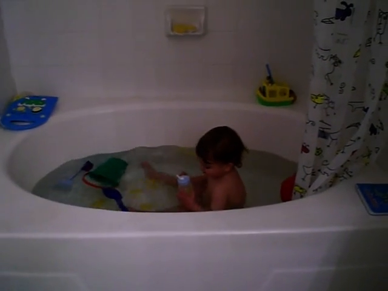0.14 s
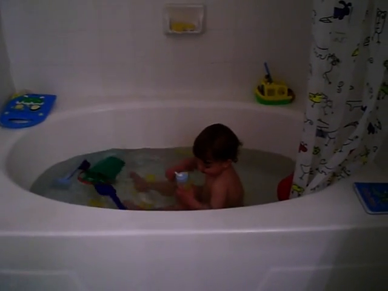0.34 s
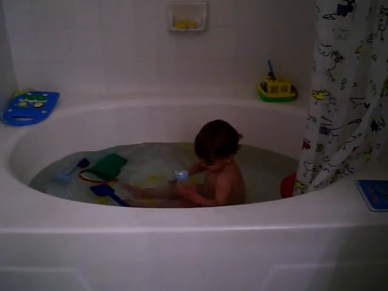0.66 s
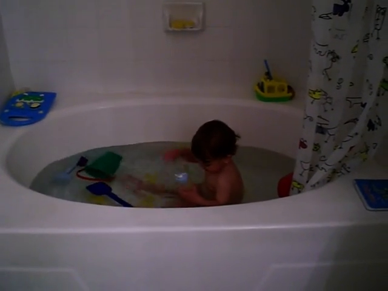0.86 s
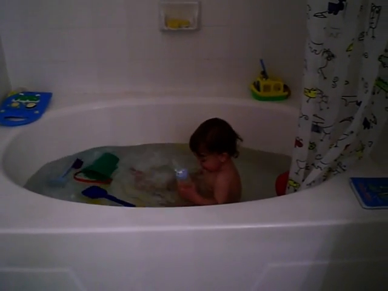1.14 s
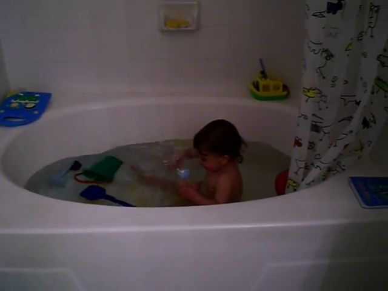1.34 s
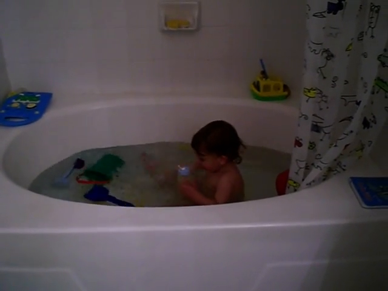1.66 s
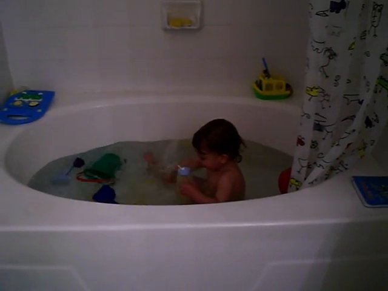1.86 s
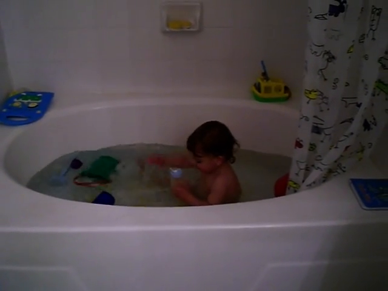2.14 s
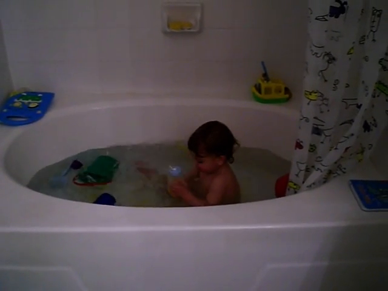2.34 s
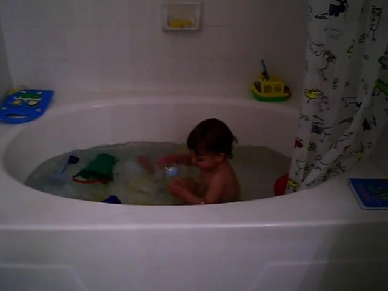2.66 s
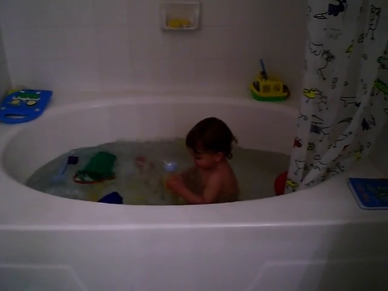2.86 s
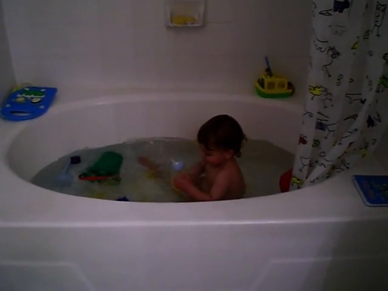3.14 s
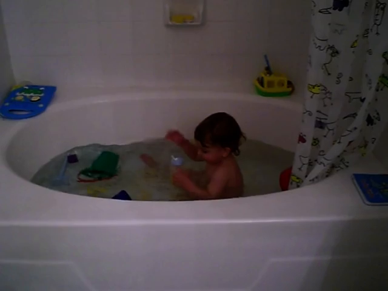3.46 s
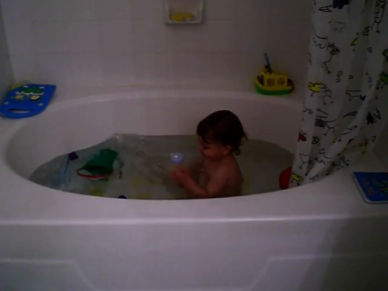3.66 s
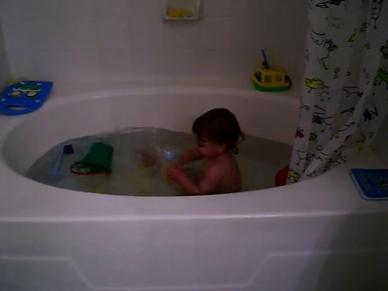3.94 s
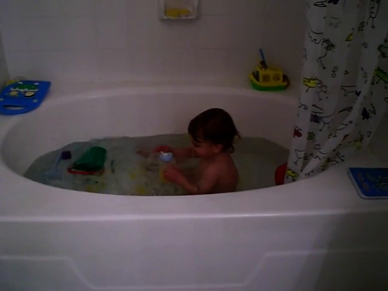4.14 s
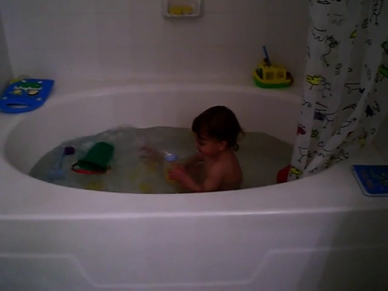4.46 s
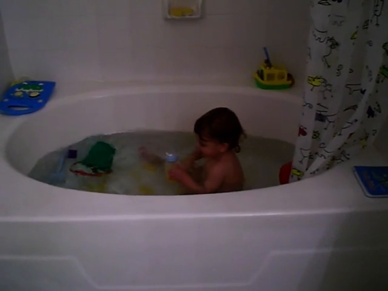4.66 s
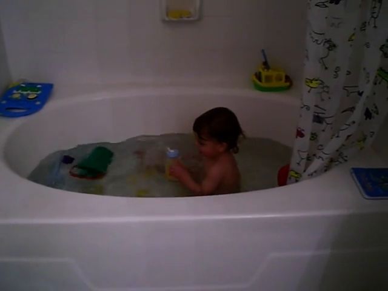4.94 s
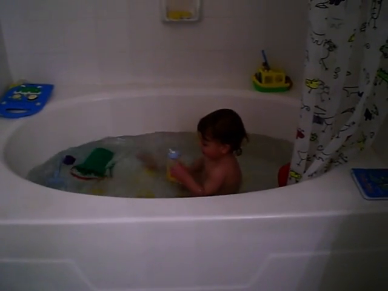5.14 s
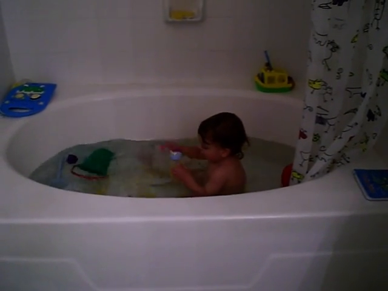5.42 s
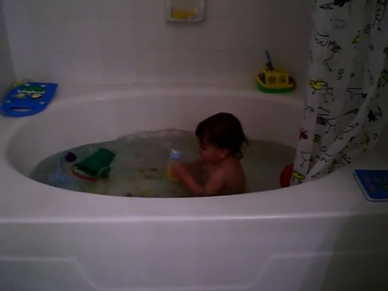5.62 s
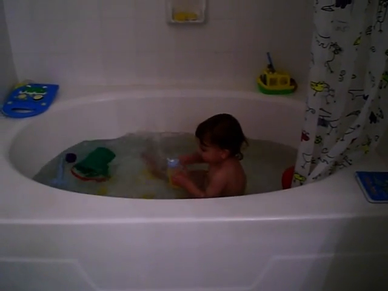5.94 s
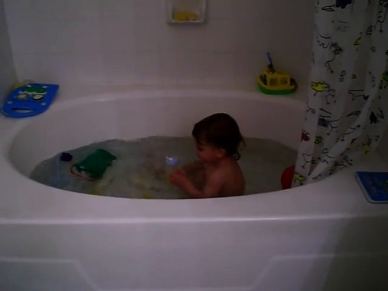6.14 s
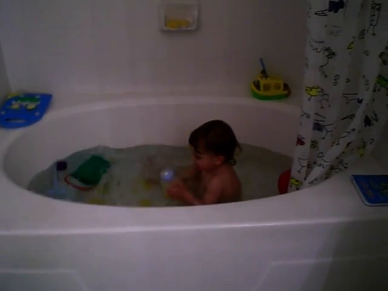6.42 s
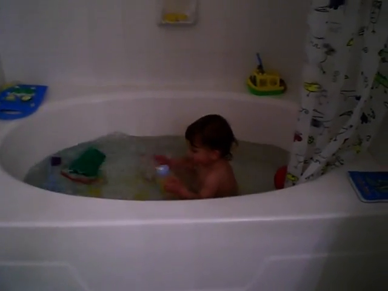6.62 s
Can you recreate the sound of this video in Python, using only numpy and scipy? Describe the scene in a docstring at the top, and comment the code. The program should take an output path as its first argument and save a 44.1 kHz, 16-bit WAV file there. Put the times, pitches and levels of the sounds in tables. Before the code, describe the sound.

A small child paddles in a bathtub inside a hard tiled alcove. Quiet room noise with a faint hum and thin whine comes first, then light slaps and plops. Harder splashes and deep, gulping plunges follow, ease briefly after four seconds, then return densely until near the end. Bubbles gurgle and trickle between strokes. One slightly overloaded microphone, mono, with short bright bathroom echoes.

```python
"""A hand and feet paddle in a bathtub inside a tiled alcove, heard by a single microphone.
At first there is only room noise with a hum and a thin whine; then small slaps throw hissing droplets and plops ring
as gliding sines. From 1.2 s deep plunges also thump the tub, and harder slaps follow until a calmer spell after 4 s.
Dense splashing returns near 4.9 s and lasts almost to the end. Swarms of tiny bubbles gurgle and trickle between
strokes, and echoes, a noisy tail and standing waves of the hard alcove follow every water sound."""
import sys
import numpy as np
from scipy import signal
from scipy.fft import rfft, irfft
from scipy.io import wavfile
from scipy.ndimage import uniform_filter1d

SR = 44100
rng = np.random.default_rng(int(sys.argv[2]) if len(sys.argv) > 2 else 0)


def persist_wave(psi):
    """Save psi, clipped to +-1, as 16-bit WAV."""
    counts = np.round(np.clip(psi, -1, 1) * 32767).astype(np.int16)
    wavfile.write(sys.argv[1], SR, np.atleast_2d(counts).T)


N = 299282

# Quiet room, shape of its noise: pitch_hz, relative level_db (per Hz)
ROOM_NOISE = [(25, -11), (86, -19), (130, -4.5), (460, -7), (1750, -16), (5100, -16.5), (7500, -19),
              (13300, -24), (14500, -32)]
# Steady faint tones: pitch_hz, level_db (rms)
HUMS = [(118.4, -63), (13184, -54)]
# Standing waves between the alcove walls: pitch_hz, relative level_db
STANDING_WAVES = [(62, -6.5), (100, 3), (165, -14), (200, -16), (218, -3.5), (250, -8), (275, -0.5),
                  (297, -3), (346, -1), (409, 2), (457, 2.5), (482, 4), (545, -9), (575, -2.5), (610, 4),
                  (664, -0.5), (727, 4), (774, -1), (800, 0), (860, -25), (910, -4.5), (959, -15.5),
                  (990, -1), (1040, -2), (1086, 0.5), (1136, 2), (1186, -4.5), (1271, 0.5), (1340, -6.5)]
# How long the alcove's tail takes to fall by 60 dB: pitch_hz, fade_s
TAIL_FADE = [(60, 0.13), (260, 0.67), (700, 0.49), (1800, 0.27), (5000, 0.44), (13000, 0.14)]
# Loudness of the scattered tail: pitch_hz, level_db
TAIL_COLOUR = [(60, -19), (350, 5.5), (600, 3), (1300, 2.5), (2000, 4.5)]
# Strokes through the water: start_s, hold_s, gurgle_db, trickle_db, mist_db
STROKES = [(0.393, 0.074, -54, -33, -40.5), (0.63, 0.077, -45, -35, -39.5), (.78, .14, -52, -31, -40.5),
           (0.986, 0.055, -35, -42, -45), (1.086, 0.14, -28.5, -25.5, -31.5),
           (1.388, 0.063, -23.5, -22, -31), (1.563, 0.23, -26.5, -22.5, -29),
           (2.003, 0.11, -28, -27.5, -34), (2.15, .18, -26.5, -23.5, -30), (2.586, 0.42, -38, -30, -35.5),
           (3.266, 0.16, -29, -29.5, -36), (3.605, 0.14, -29, -28.5, -29.5),
           (3.993, 0.16, -34.5, -25.5, -35.5), (4.233, 0.26, -35, -35, -39.5),
           (4.783, 0.04, -30, -30.5, -37.5), (4.892, 0.25, -28.5, -27, -36.5),
           (5.365, 0.11, -28, -28, -32.5), (5.543, 0.16, -29.5, -26, -32), (5.987, 0.051, -29, -31, -36),
           (6.066, 0.21, -34, -27.5, -32), (6.541, .25, -23, -26, -34.5)]
# Deep plunges: start_s, level_db, cavity pitch_hz, ring_s (fall of 60 dB), tub wall_db, tub floor_db
PLUNGES = [(1.224, -10.5, 408, 0.033, -38, -60), (1.659, -35, 401, 0.04, -34, -59),
           (1.81, -32.5, 283, 0.19, -58, -61), (2.001, -27, 231, 0.12, -31, -51),
           (2.342, -8.5, 285, 0.087, -20.5, -42), (2.977, -12.5, 292, 0.15, -50, -43),
           (3.628, -32.5, 406, 0.07, -50, -67), (3.758, 0.5, 395, 0.034, -13, -35),
           (4.16, -27, 487, 0.17, -60, -71), (4.414, -20.5, 256, 0.22, -37, -70),
           (5.086, -12, 307, 0.08, -23, -35.5), (5.718, -16, 311, 0.13, -16.5, -30.5),
           (6.244, -2.5, 312, 0.036, -17, -33), (6.483, -25.5, 338, 0.079, -38, -74)]
# Air pockets closing under water: start_s, level_db, pitch_hz, burst of neighbours_db (against the plop)
PLOPS = [(0.291, -31, 6000, -2), (0.334, -32, 2140, -6), (0.355, -21, 5600, 2), (0.356, -28, 2600, 11),
         (0.376, -9, 1800, -25), (0.365, -32, 990, -8), (0.428, -24, 1150, -1), (0.464, -20, 1345, -1),
         (0.583, -18, 3000, -21), (0.657, -33, 1240, 14), (0.699, -18, 1110, -16), (0.775, -26.5, 826, 6),
         (0.798, -23, 2670, 12), (0.836, -14.5, 1030, -4), (0.934, -23, 3210, -17),
         (0.974, -24.5, 750, 6.5), (1.051, -15.5, 2620, -12), (1.099, -22.5, 1760, 14.5),
         (1.117, -6, 1174, -22), (1.199, -5, 886, -3), (1.211, -1.5, 950, -5), (1.224, -6, 874, -7),
         (1.249, -14, 725, -2), (1.385, -23.5, 1370, 16.5), (1.526, -20, 1940, -19), (1.597, -10, 810, -7),
         (1.66, -17.5, 924, -17), (1.782, -1.5, 3510, -2), (2.003, -22.5, 610, -5), (2.12, -18, 1630, -20),
         (2.214, -8, 2232, -16), (2.343, -0.5, 728, -3), (2.375, -37, 680, -2), (2.627, -7.5, 1430, -21),
         (2.673, -5, 823, -2), (2.806, -29, 1760, -6), (2.829, -15.5, 3500, 3), (2.867, -14, 1107, 2),
         (2.958, 1.5, 614, -1), (2.975, -7.5, 472, -2), (3.087, -13, 665, -14), (3.273, -14, 1017, 8),
         (3.38, -16, 823, -23), (3.592, -13.5, 1540, -15), (3.724, -9.5, 1047, 8), (3.757, -3, 1077, -19),
         (3.95, -24, 2480, 12.5), (4.005, -13, 780, 5), (4.022, -17, 3030, -10), (4.024, -19, 774, 13),
         (4.061, -13, 1116, 0), (4.251, -23.5, 542, -15), (4.251, -17, 1350, -13), (4.379, -23, 600, 7),
         (4.491, -12, 937, -14), (4.745, -23, 2180, 5), (4.766, -6.5, 1030, 3), (4.888, -11.5, 1705, -26),
         (4.917, -10, 3160, -1), (4.95, -10, 3580, -15), (5.035, -8.5, 950, 5), (5.073, -3.5, 810, 7.5),
         (5.139, -14.5, 590, -17), (5.371, -4.5, 749, -5.5), (5.409, -16, 728, -15), (5.487, -28, 700, -16),
         (5.555, -5.5, 1395, -10), (5.695, -8, 740, 0), (5.715, -11, 738, 11.5), (5.94, -18, 1354, -15),
         (5.946, -13, 645, 5), (6.036, -19, 704, -24), (6.089, -11, 2230, 0.5), (6.119, -9.5, 2440, 4.5),
         (6.195, -10, 1110, -2), (6.228, -5.5, 670, -2), (6.236, -6, 636, 1.5), (6.289, -11, 567, -15),
         (6.5, -14, 1890, -23), (6.557, -13, 856, -13), (6.646, -11, 1050, -10), (6.724, -10, 2910, 1)]
# Surface struck, or drops landing: start_s, relative level_db, body_db (against the level), tilt_db_per_octave
SLAPS = [(0.2887, -33.5, -35, 3.5), (0.3544, -18, -38, -8.5), (0.554, -22, -32, 3),
         (0.5806, -10.5, -31, -2.5), (0.712, -11, -36, -1), (0.9348, -22.5, -34, -10),
         (1.0528, -14.5, -30, -8.5), (1.098, -4, -26, -1), (1.198, -14, -1, -9), (1.2107, -7.5, 0.5, -5),
         (1.2234, -9, -1.5, -9), (1.3875, -23.5, -6, -12.5), (1.5303, -17.5, -52, -10.5),
         (1.6612, -1, -12.5, -2), (1.7856, -5.5, -19.5, -6.5), (1.806, -15, -15, -3),
         (1.922, -14.5, -15.5, 1.5), (2.094, -13.5, -19, -4.5), (2.2112, -4.5, -21, -2.8),
         (2.3427, -7, 1, -9), (2.375, -13, -4.5, -7.5), (2.626, -18.5, -3, -12.5), (2.808, -19, -29, -9),
         (2.8377, -9.5, -30, -0.5), (2.9162, -15, -2.5, -7), (2.9584, -14, 0, -5), (2.9689, -7, 0.5, -4.5),
         (3.19, -34.5, 4, -10), (3.275, -29, 7.5, -11), (3.379, -27, -26, 2), (3.4992, -20.5, -26, -7),
         (3.5906, -23, -26, -12), (3.6098, -10.5, -21, 3), (3.6214, -8.5, -12.5, -2.5),
         (3.7551, -2.5, -1.5, -5), (3.9502, -22.5, -11, -3), (4.0677, -15.5, -20, -6.5),
         (4.2863, -15.5, -35, 4.5), (4.308, -18, -25, -5), (4.4115, -33.5, 15, -3),
         (4.7615, -19.5, 5.5, 5.5), (4.9164, -9, -15, -3.5), (4.954, -4.5, -28, -0.5),
         (5.04, -9.5, -22, -8), (5.086, -2.5, -11, -11.5), (5.3717, -35, 16.5, -9), (5.4081, -22, 9, -7),
         (5.5577, -6, -16.5, -0.2), (5.575, -2, -24, -3.3), (5.7065, -8, -6, -3),
         (5.718, -5.5, -0.5, -11.5), (5.9475, -31, -2, -3), (6.0462, -28, 7.5, 11), (6.112, -13.5, -28, -1),
         (6.122, -9, -2.5, -5.5), (6.144, -29, -15, -14), (6.2375, -10, 1, -9), (6.5339, -26, -0.5, -11),
         (6.6698, -9.5, -8, -8.5), (6.725, -16, -10, -4)]
# Tone colour of the flying droplets: pitch_hz, relative level_db
SPRAY_COLOUR = [(100, -45), (400, -43), (1500, -19.5), (2500, -2.5), (5000, 2.5), (8000, 3), (12000, -4.5),
                (16000, 14)]
# Tone colour of the duller smack: pitch_hz, relative level_db
BODY_COLOUR = [(40, -53), (300, -23), (480, -37), (600, 5), (900, 1), (1500, 1.5), (2500, -7.5),
               (5000, -21)]
# Narrow dips from the microphone housing: pitch_hz, width_hz (at half depth), level_db
HOUSING_DIPS = [(6650, 180, -15), (7480, 180, -15)]
# Top of the microphone's range: pitch_hz, level_db
ROLL_OFF = [(13500, -3), (15100, -18.5), (15400, -22), (16200, -49)]

ROOM_NOISE_DB = -47  # rms
BAND_LIMIT_HZ = 16190
TUB_WALL_HZ, TUB_FLOOR_HZ = 168, 62

# Strokes swell and fade, in dB per second
ATTACK_DB_PER_S = 339
RELEASE_DB_PER_S = 142, 195, 65  # gurgle, trickle, mist
# What a plop or slap leaves behind: level_db against the event, fade_db_per_s
AFTER_GURGLE, AFTER_TRICKLE, AFTER_MIST = (-25, 153), (-25.5, 370), (-24, 160)
# Octaves from 5 kHz at which a slap's tilt sets its trickle and mist
TRICKLE_OCTAVES, MIST_OCTAVES = -0.28, 0.33
# Foam fizz joins the mist and late drips join the trickle, long after a slap
FIZZ_DB, DRIP_DB, FIZZ_FADE_DB_PER_S = -44, -31, 35
# The gurgle keeps the pitch of the latest loud plops
GURGLE_TOP_HZ, PITCH_MEMORY_DB_PER_S = 1250, 110

PLOP_RISE_OCTAVES = 0.17
PLOP_RING_S, RING_SLOPE = 0.052, 0.067  # 60 dB fall at 1 kHz; smaller bubbles die sooner
SPRAY_S, SPRAY_DB_PER_DOUBLING = 0.018, 44  # time constant at level 0 dB; weaker slaps thin out sooner


def gain_of(db):
    """Turns decibels into amplitude."""
    return 10 ** (np.asarray(db) / 20)


def evened(x):
    """Scales a sound to an rms of 1."""
    return x / np.sqrt(np.mean(x ** 2) + 1e-20)


def read(points, hz):
    """Reads a curve between its points, on a log-frequency axis."""
    f, value = np.transpose(points)
    return np.interp(np.log(hz + 1), np.log(f + 1), value)


def coloured(x, points):
    """Filters a sound by a curve of levels in dB."""
    return irfft(rfft(x) * gain_of(read(points, np.fft.rfftfreq(len(x), 1 / SR))), len(x))


def add(mix, s, sound):
    """Mixes a sound in, starting at time s."""
    part = mix[round(s * SR):][:len(sound)]
    part += sound[:len(part)]


def bubble(hz, rise, t60):
    """A dying sine that glides up by `rise` octaves as the air pocket nears the surface."""
    t60 = max(t60, 0.002)
    t = np.arange(round(t60 * SR)) / SR
    turns = np.cumsum(hz * 2 ** (rise * t / t60)) / SR
    fade = gain_of(-60 * t / t60)
    onset = (1 - np.exp(-t * hz * 1.85)) ** 2
    return fade * onset * np.sin(2 * np.pi * turns)


def hush():
    """Low room noise with a hum and a thin whine."""
    t = np.arange(N) / SR
    tones = sum(np.sqrt(2) * gain_of(db) * np.sin(2 * np.pi * hz * t) for hz, db in HUMS)
    noise = evened(coloured(rng.standard_normal(N), ROOM_NOISE))
    return gain_of(ROOM_NOISE_DB) * noise + tones


def early_echoes():
    """The first bounces off the tiles: 24 random fading clicks."""
    echoes = np.zeros(1400)
    echoes[rng.integers(60, 1400, 24)] = rng.choice([-1., 1.], 24)
    echoes *= np.exp(-np.arange(1400) / 340.0)
    return echoes / np.linalg.norm(echoes)


def scattered_tail(x):
    """Sound energy lingers in each pitch band, while the rippling surface keeps scrambling its waves."""
    hz, _, frames = signal.stft(x, SR, nperseg=512, noverlap=384)
    keep = gain_of(-120 * 128 / SR / read(TAIL_FADE, hz))  # power kept from one frame to the next
    power = [signal.lfilter([0, 0, 0, 1 - k], [1, -k], abs(row) ** 2) for k, row in zip(keep, frames)]
    a, b = rng.standard_normal((2, *frames.shape[::-1])).transpose(0, 2, 1)
    scrambled = np.sqrt(power) * (a + 1j * b)
    tail = signal.istft(scrambled, SR, nperseg=512, noverlap=384)[1][:N]
    return coloured(tail, TAIL_COLOUR)


def standing_waves():
    """Waves trapped between walls ring at fixed pitches; each falls 50 dB in the tail's fade time."""
    t = np.arange(SR) / SR
    ring = np.zeros(SR)
    for k, (hz, db) in enumerate(STANDING_WAVES):
        fade = gain_of(db - 50 * t / read(TAIL_FADE, hz))
        ring += (-1) ** k * fade * np.sin(2 * np.pi * hz * t)
    return ring / np.linalg.norm(ring)


def alcove(x):
    """Hard walls answer with early echoes, a scattered tail and standing waves."""
    early = gain_of(-1.0) * signal.oaconvolve(x, early_echoes())[:N]
    waves = gain_of(-11.5) * signal.fftconvolve(x, standing_waves())[:N]
    return early + scattered_tail(x) + waves


def swell(start, hold, db, release_db_per_s, attack_db_per_s):
    """Power of events that rise, hold and fade: one row each, a point every 64 samples."""
    t = np.arange(0, N + 64, 64) / SR - np.asarray(start)[:, None]
    before = np.maximum(-t, 0)
    after = np.maximum(t - np.asarray(hold)[..., None], 0)
    fade_db = attack_db_per_s * before + release_db_per_s * after
    return gain_of(np.maximum(np.asarray(db)[:, None] - fade_db, -150)) ** 2


def stirring():
    """Strokes, plops and slaps set the levels of gurgle, trickle and mist, and the gurgle's pitch in octaves."""
    start, hold, *stroke_dbs = np.transpose(STROKES)
    plop_s, plop_db, plop_hz, _ = np.transpose(PLOPS)
    slap_s, slap_db, _, tilt_db = np.transpose(SLAPS)

    def left_by(s, db, fade):
        return swell(s, 0., db, fade, 1e5).sum(0)  # starts almost at once

    gurgle = left_by(plop_s, plop_db + AFTER_GURGLE[0], AFTER_GURGLE[1])
    trickle = left_by(slap_s, slap_db + TRICKLE_OCTAVES * tilt_db + AFTER_TRICKLE[0], AFTER_TRICKLE[1])
    drips = left_by(slap_s, slap_db + DRIP_DB, FIZZ_FADE_DB_PER_S)
    mist = left_by(slap_s, slap_db + MIST_OCTAVES * tilt_db + AFTER_MIST[0], AFTER_MIST[1])
    fizz = left_by(slap_s, slap_db + FIZZ_DB, FIZZ_FADE_DB_PER_S)

    rows = []
    for db, release, left in zip(stroke_dbs, RELEASE_DB_PER_S, (gurgle, trickle + drips, mist + fizz)):
        stroke_power = swell(start, hold, db, release, ATTACK_DB_PER_S).sum(0)
        rows.append(np.sqrt(stroke_power + left))
    recent = swell(plop_s, 0., plop_db, PITCH_MEMORY_DB_PER_S, ATTACK_DB_PER_S)
    rows.append(np.log2(np.minimum(plop_hz, GURGLE_TOP_HZ)) @ recent / recent.sum(0))
    # fill in every sample between the points
    return [np.interp(np.arange(N) / 64, np.arange(len(row)), row) for row in rows]


def swarm(pitches_hz, per_s, cycles, spread_db, weight):
    """Random bubbles of many sizes, `per_s` at each pitch; weight(hz) favours some sizes."""
    out = np.zeros(N)
    for hz in pitches_hz:
        strength = gain_of(spread_db * np.minimum(rng.exponential(1, N), 4))
        hits = strength * (rng.random(N) < per_s / SR)
        out += signal.oaconvolve(hits * weight(hz), bubble(hz, 0.6, cycles / hz))[:N]
    return evened(out)


def stirred():
    """Large bubbles gurgle, small ones trickle, the finest droplets hiss as mist."""
    gurgle_level, trickle_level, mist_level, centre = stirring()

    def near_centre(hz):
        return np.exp(-((np.log2(hz) - centre) / 0.53) ** 2)

    gurgle = swarm(np.geomspace(480, 2200, num=30), 22, 26.6, 3.66, near_centre)
    trickle = swarm(np.geomspace(1500, 6300, num=30), 20, 18.6, 3.0, lambda hz: (hz / 3000) ** -0.1)
    mist = swarm(np.geomspace(6300, 15500, num=12), 90, 7, 4.4, lambda hz: (hz / 9000) ** 0.018)
    return gurgle_level * gurgle + trickle_level * trickle + mist_level * mist


def plunges():
    """A deep cavity rings and collapses in gulps, and the shove makes the tub's wall and floor ring."""
    out = np.zeros(N)
    for (s, db, hz, t60, wall_db, floor_db), chance in zip(PLUNGES, rng.random((len(PLUNGES), 6, 2))):
        for late, detune in chance:  # gulps grow weaker, and tend to be higher, the later they come
            gulp = bubble(hz * 2 ** (0.632 * detune - 0.3 + 0.35 * late), 0.44, t60 * 0.39)
            add(out, s + 0.12 * late, gain_of(db - 6.5 - 9.6 * late) * gulp)
        add(out, s, gain_of(db) * bubble(hz, 0.33, t60))
        add(out, s + 0.00539, gain_of(db - 2.5) * bubble(hz * 0.761, 0.12, t60))
        add(out, s, gain_of(wall_db) * bubble(TUB_WALL_HZ, 0.09, 0.59))
        add(out, s, gain_of(floor_db) * bubble(TUB_FLOOR_HZ, 0, 0.82))
        add(out, s, gain_of(floor_db + 16.0) * bubble(32, 0.1, 0.088))  # the shove itself, over quickly
    return out


def plops():
    """A closing air pocket rings as one bubble, with a burst of shorter neighbours."""
    out = np.zeros(N)
    for (s, db, hz, burst_db), chance in zip(PLOPS, rng.random((len(PLOPS), 9, 3))):
        t60 = PLOP_RING_S * (1000 / hz) ** RING_SLOPE
        add(out, s, gain_of(db) * bubble(hz, PLOP_RISE_OCTAVES, t60))
        for late, detune, weaker in chance:
            neighbour = bubble(hz * 2 ** (0.79 * (detune - 0.45)), PLOP_RISE_OCTAVES * 0.5, t60 * 0.21)
            add(out, s + 0.06 * late ** 2, gain_of(db + burst_db - 4.5 * weaker) * neighbour)
    return out


def slaps():
    """A sharp burst of droplets that thins out, over a duller smack."""
    out = np.zeros(N)
    t = np.arange(SR // 5) / SR
    silence = 0 * t  # room for the filters to ring out
    noises = rng.standard_normal((len(SLAPS), 3, len(t)))
    for (s, db, body_db, tilt_db), (drops, smack, chance) in zip(SLAPS, noises):
        length = SPRAY_S * 2 ** (db / SPRAY_DB_PER_DOUBLING)
        burst = (1 - np.exp(-t / 0.0004)) * np.exp(-t / length)
        shape = burst / np.sqrt(length + 0.0053)  # longer bursts start lower
        # droplets land in clumps
        clumps = gain_of(5.0 * chance + 4.14 * evened(uniform_filter1d(chance, size=60)))
        colour = [(hz, level + tilt_db * np.log2(max(hz, 400) / 5000)) for hz, level in SPRAY_COLOUR]
        spray = coloured(np.r_[shape * drops * clumps, silence], colour)
        body = coloured(np.r_[shape * smack, silence], BODY_COLOUR)
        add(out, s, gain_of(db - 22.0) * spray)
        add(out, s, gain_of(db + body_db - 6.0) * body)
    return out


def scene():
    """Water, its alcove and the room reach one microphone, which feeds both channels."""
    water = slaps() + plops() + plunges() + stirred()
    mono = water + alcove(water) + hush()
    return np.array([mono, mono])


def record(dry):
    """The microphone overloads softly, its housing cuts two narrow dips, and its treble rolls off to a band limit."""
    hz = np.fft.rfftfreq(N, 1 / SR)
    dips_db = sum(db / (1 + ((hz - f) / (width / 2)) ** 2) for f, width, db in HOUSING_DIPS)
    overloaded = 1.803 * np.tanh(dry / 3.16)
    heard = irfft(rfft(overloaded) * gain_of(dips_db + read(ROLL_OFF, hz)), N)
    band_limit = signal.firwin(511, BAND_LIMIT_HZ, window=("kaiser", 9), fs=SR)
    return signal.oaconvolve(heard, band_limit[None], "same")


dry = scene()
out = record(dry)
persist_wave(out)
```